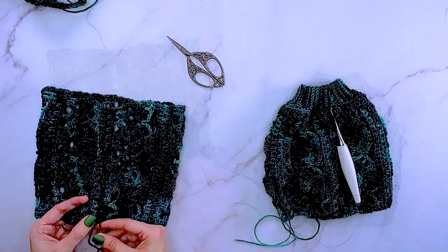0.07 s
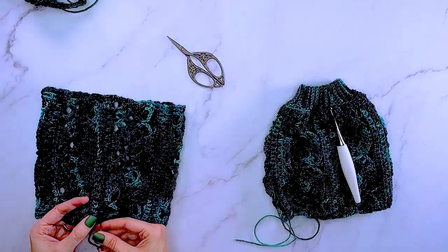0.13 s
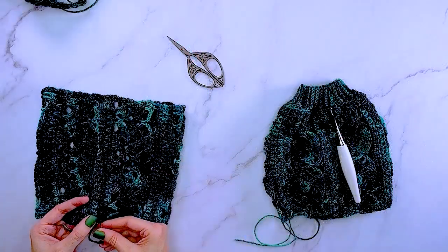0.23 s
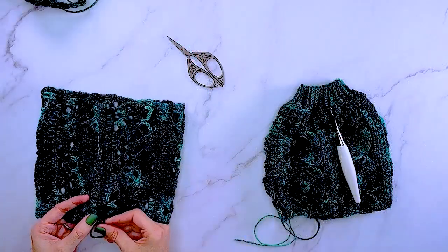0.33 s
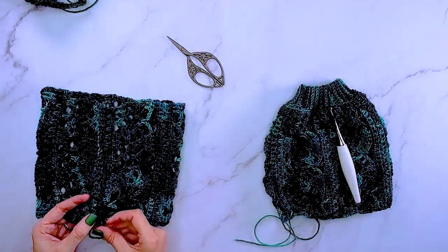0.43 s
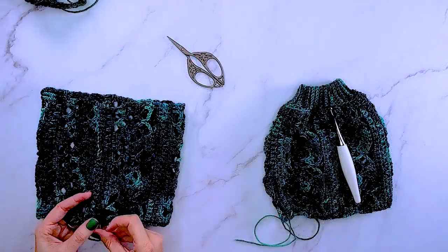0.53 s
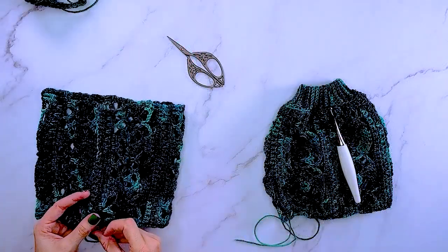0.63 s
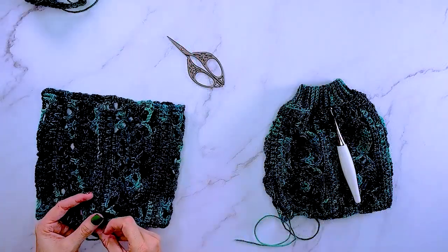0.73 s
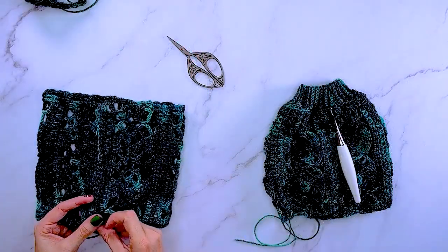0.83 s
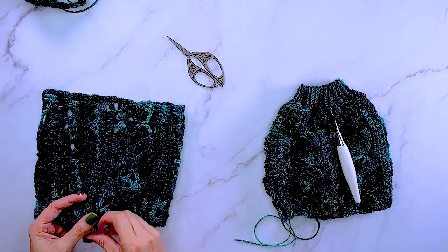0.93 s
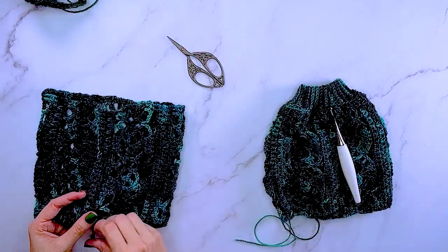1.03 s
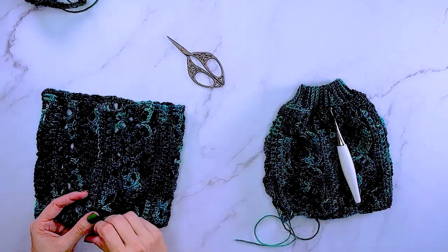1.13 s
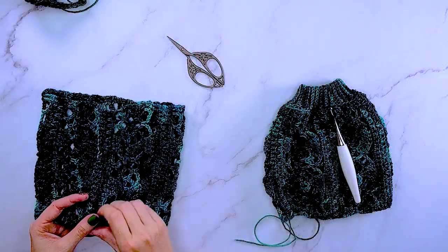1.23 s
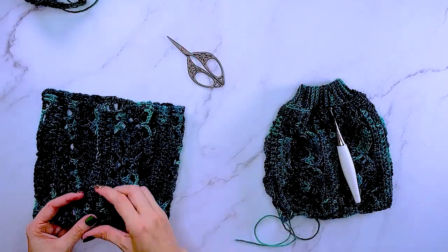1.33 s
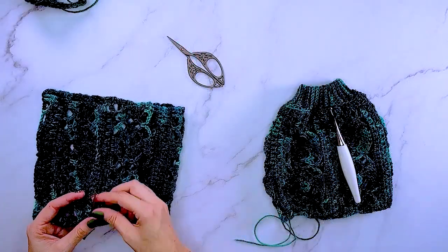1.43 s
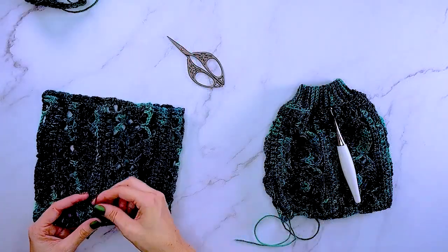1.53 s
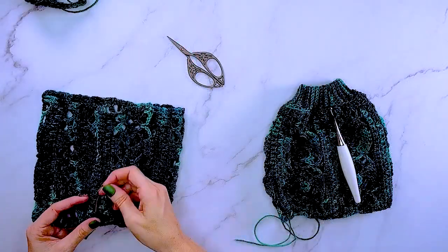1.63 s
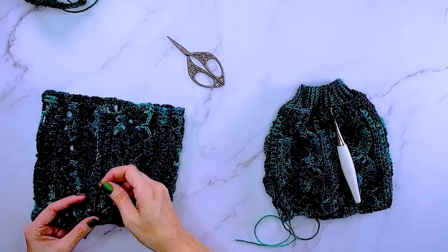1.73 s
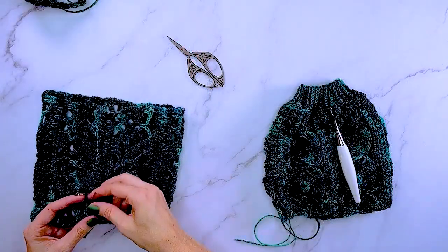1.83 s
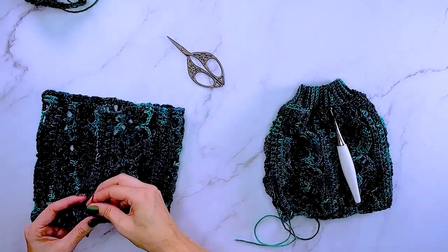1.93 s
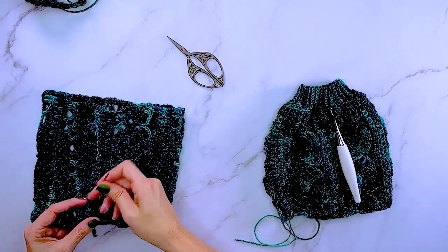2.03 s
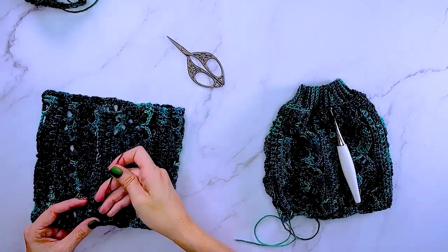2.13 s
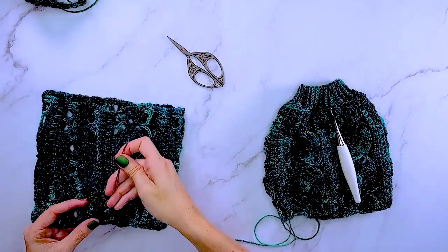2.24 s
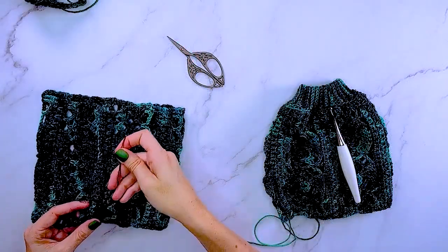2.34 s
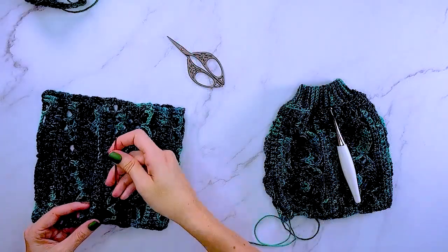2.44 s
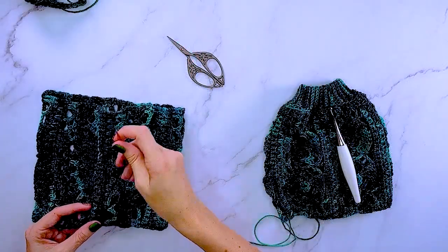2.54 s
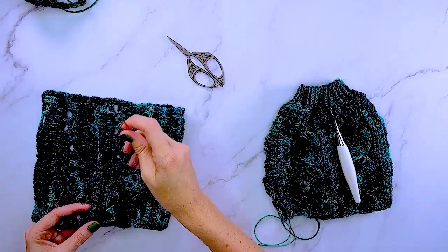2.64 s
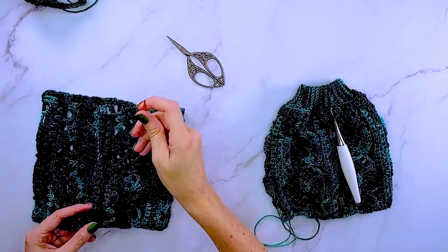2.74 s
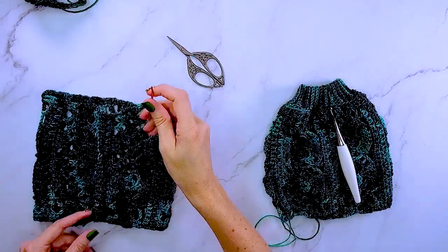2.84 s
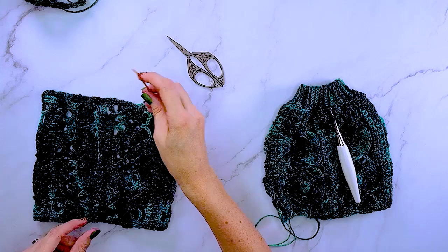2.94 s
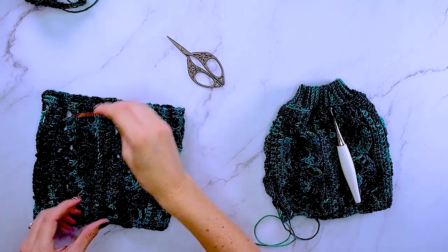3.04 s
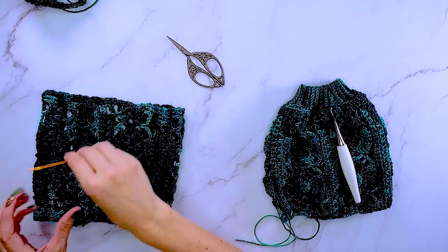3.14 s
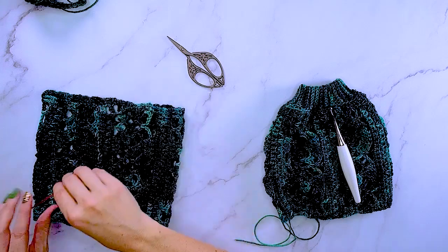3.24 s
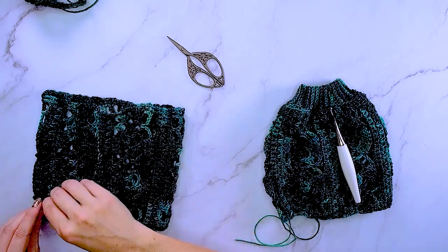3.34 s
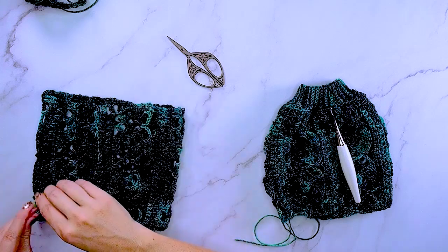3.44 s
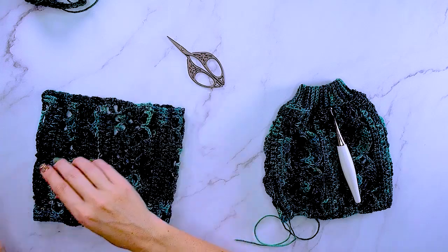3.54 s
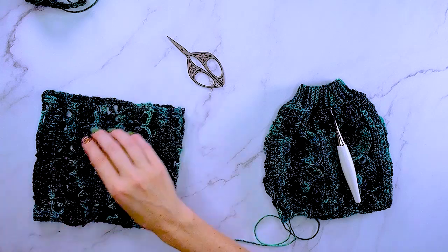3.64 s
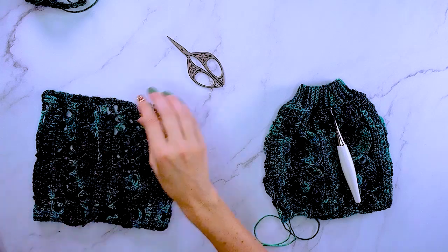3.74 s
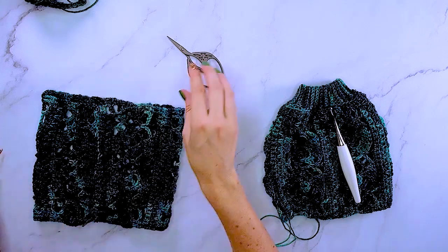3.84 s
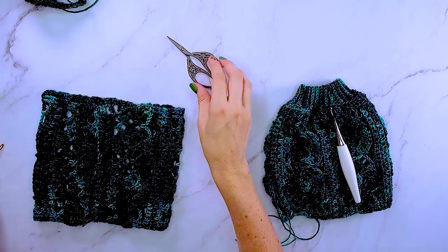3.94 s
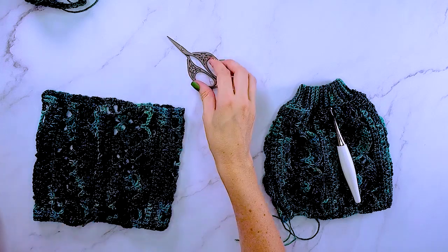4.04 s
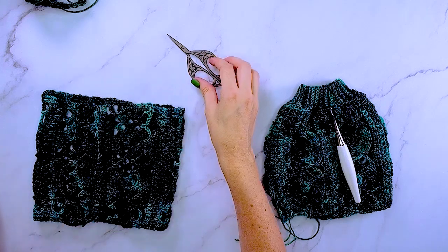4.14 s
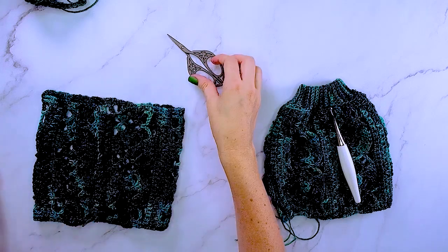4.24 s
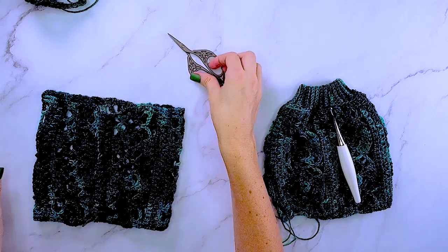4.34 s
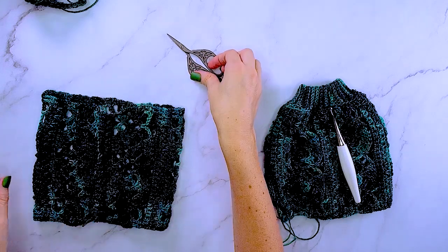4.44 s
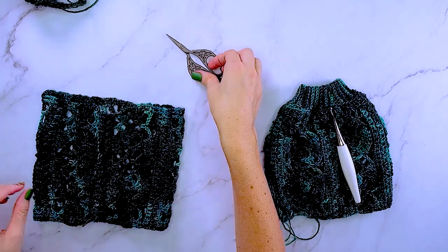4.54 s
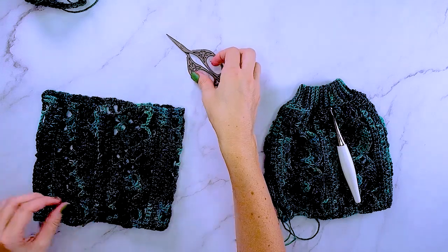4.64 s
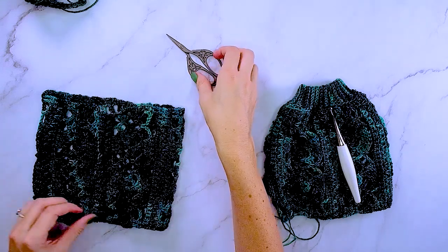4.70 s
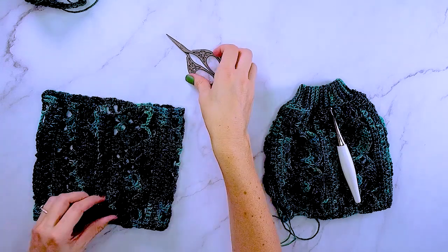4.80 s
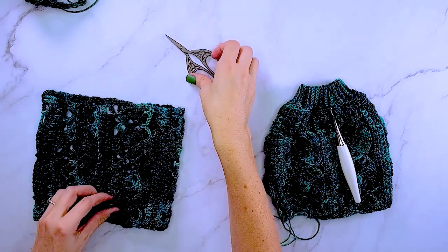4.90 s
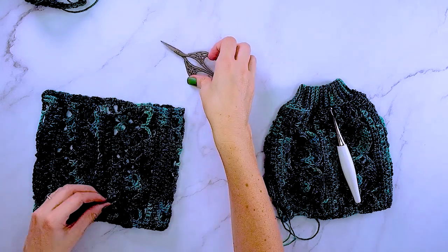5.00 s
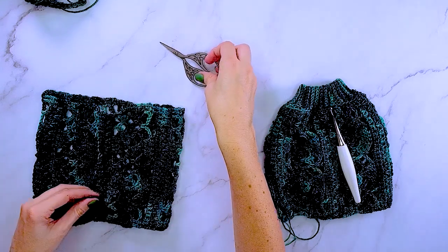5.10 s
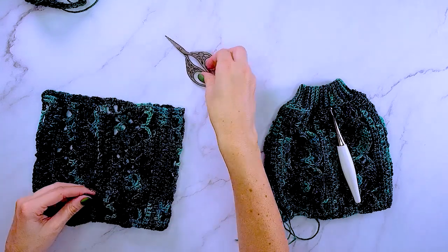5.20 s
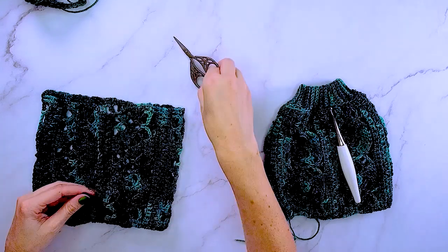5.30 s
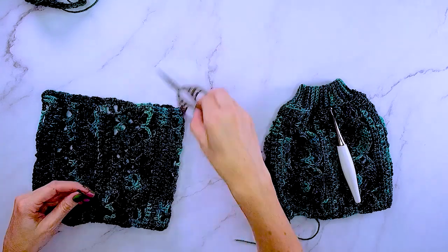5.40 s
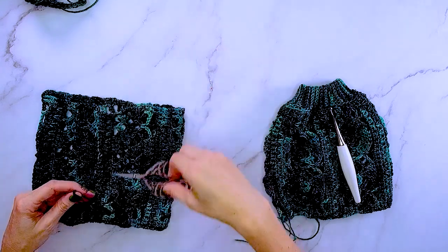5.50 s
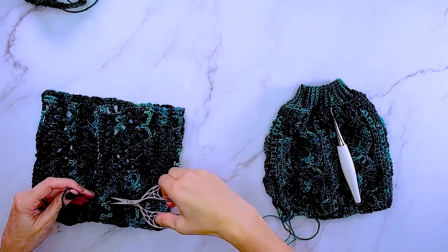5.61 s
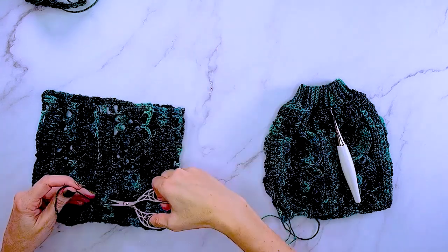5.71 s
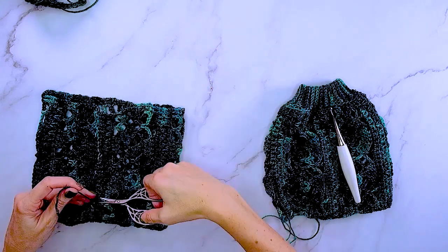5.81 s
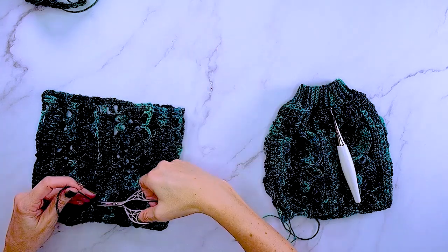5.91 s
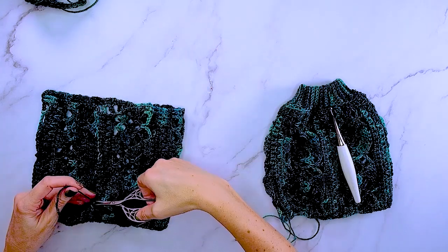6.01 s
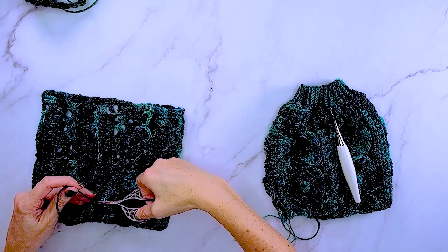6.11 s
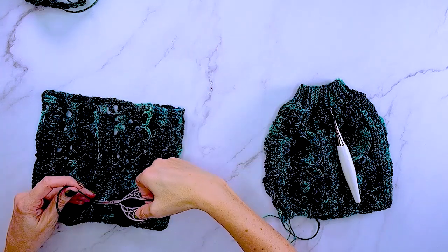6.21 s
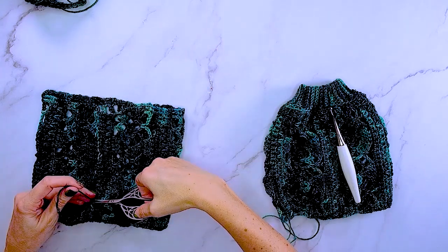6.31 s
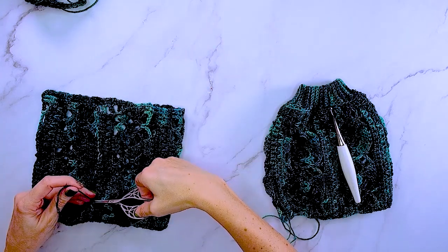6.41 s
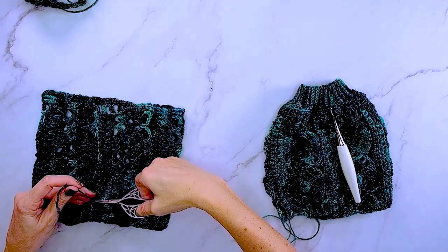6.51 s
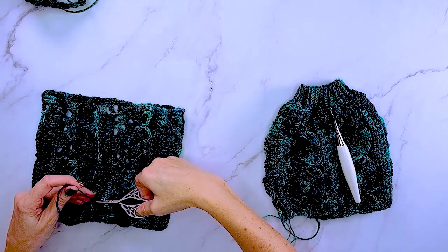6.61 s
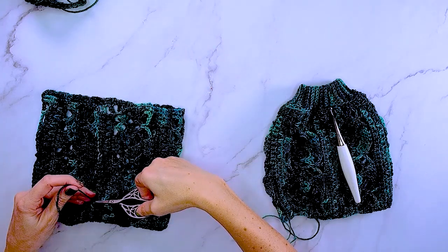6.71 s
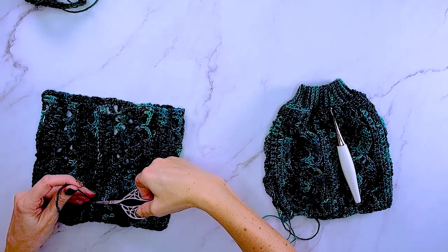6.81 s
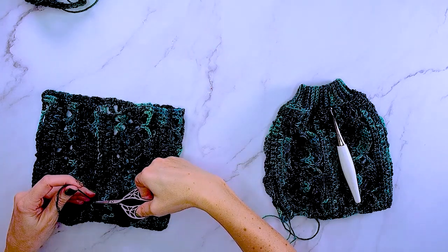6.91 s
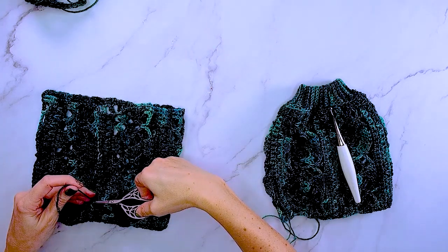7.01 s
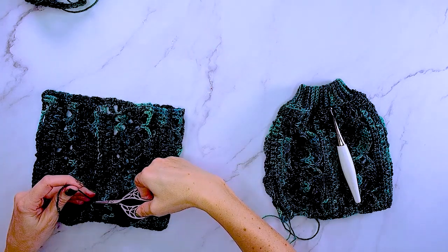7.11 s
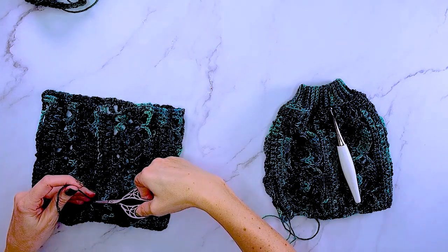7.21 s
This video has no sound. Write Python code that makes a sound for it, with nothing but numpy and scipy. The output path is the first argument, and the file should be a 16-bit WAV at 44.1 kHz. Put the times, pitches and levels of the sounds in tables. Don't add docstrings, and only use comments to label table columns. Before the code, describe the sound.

Quiet yarn tugs with tiny ticks, a distant vehicle hum, then fingers fumbling steel scissors off a hollow hard tabletop, ending in room tone.

```python
import sys
import numpy as np
from scipy import signal
from scipy.fft import rfft, irfft, next_fast_len
from scipy.io import wavfile
from scipy.ndimage import uniform_filter1d, map_coordinates

SR = 44100
rng = np.random.default_rng(int(sys.argv[2]) if len(sys.argv) > 2 else 0)


def makeup_ratio(level_db):
    decades = np.asarray(level_db, float) / 20
    return 10 ** decades


def log_audio(samples):
    frames = np.atleast_2d(samples).T
    limited = np.clip(frames, -1, 1)
    pcm = np.round(limited * 32767).astype(np.int16)
    wavfile.write(sys.argv[1], SR, pcm)


N = 319945

# start_s, knock_db, then relative to it boom_db, body_db, panel_db
BLOWS = [(3.983, -40, -36, -21, -11), (4.0486, -43, 1.5, 0, -3.5), (4.06, -38.5, -1, -6, -3.5),
         (4.0963, -40.5, 11.5, 3.5, 1), (4.1753, -28.5, -12, -24, -6.5),
         (4.1989, -33.5, -24.5, -14.5, -9.5), (4.4165, -24.5, -9.5, -20, -14),
         (4.651, -40.5, -0.5, -9, -1.5), (4.699, -38, -3, -9.5, -7), (4.8874, -34, 2, -19.5, -3.5),
         (5.0514, -27, -32, -18, 2), (5.1433, -20.5, -14.5, -14, -7), (5.1512, -28.5, -1.5, -0.5, -3.5),
         (5.2266, -18, -16.5, -9, -6)]
# mode1_db, mode2_db, mode3_db, mode4_db
BLOW_SPOT = [(0, 5.5, -3, -6), (-4, 2, 3.5, 1), (-3.5, -1.5, 0.5, 0.5), (2.5, -3.5, 1, 0.5),
             (-0.5, -9, 2, 4), (-0.5, -3, -1, 2.5), (2.5, 7, -3, -11), (-5, 9, 6, -8), (-3.5, 3.5, -5, 7),
             (2.5, 1.5, -5.5, 0.5), (-6.5, -1, 1, -7), (-4.5, 5, -14, 3), (1, -0.5, -6, 3),
             (-1, 3.5, -0.5, 3)]
# mode1_db, mode2_db, mode3_db, mode4_db
FURTHER_SPOT = (-4, 0.5, 0.5, 0.5)
BLOW_FIRST_HZ = [1046, 1046, 1046, 1046, 1040, 1050, 1050, 1060, 1046, 1046, 1000, 950, 950, 984]
# start_s,
# knock_db, softness_ratio (0 nail, 1 finger pad)
FURTHER_KNOCKS = [(0.406, -67, 0.54), (0.735, -78, 0.67), (3.9705, -57.5, 0.05), (4.0773, -40, 0.49), (4.083, -46, 1),
                  (4.1, -47.5, 0.74), (4.137, -54.5, 0.8), (4.1811, -35, 0.22), (4.2049, -42.5, 0.29),
                  (4.2237, -46, 0.25), (4.234, -51, .5), (4.2935, -52, 0.32), (4.3035, -46.5, 0.18),
                  (4.314, -56, 0.33), (4.3413, -45.5, 0.32), (4.3605, -49.5, 0.42), (4.556, -60.5, 0.75),
                  (4.584, -63, 0.22), (4.598, -53.5, .3), (4.613, -51.5, .1), (4.636, -53, .2), (4.6602, -43, 0.16),
                  (4.721, -60, .1), (4.7991, -53, 0.34), (4.9342, -43, 0.56), (5.0705, -37.5, 0.19),
                  (5.0734, -44, 0.19), (5.082, -43.5, .2), (5.0885, -44, 0.37), (5.095, -49, 0.17),
                  (5.1407, -31.5, 0.14), (5.1463, -33, 0.22), (5.157, -37, 0.59), (5.1642, -53, 0.62),
                  (5.2249, -40.5, 0.26), (5.247, -41, 0.3)]
# pitch_hz, level_db, t60_s
BOOM_MODES = [(162, 1, 0.093), (183, 0, 0.1), (127.4, -23, 0.13)]
BODY_MODES = [(295, -8.5, 0.065), (336.4, -9, 0.11), (410, -2, 0.091), (502.6, 2, 0.08)]
PANEL_MODES = [(597, -4, 0.032), (735, 2.5, 0.029), (886, -20.5, 0.14)]
KNOCK_MODES = [(1035, 0, 0.038), (1250, 0, 0.034), (1670, -3, 0.02), (1945, -10, 0.018)]
# start_s, peak_db, width_s
FLICKS = [
    (4.0497, -36.5, 0.0004),
    (4.061, -36, 0.00078),
    (4.0989, -34.5, 0.00078),
    (4.104, -34, .0008),
    (4.6985, -46, 0.00049),
    (5.2268, -29, 0.00026),
]
# start_s, level_db, upper_mode_db
EDGE_BLOWS = [
    (5.0512, -43, 1.5),
    (5.1435, -30.5, -11),
    (5.1517, -39, -8),
    (5.2265, -34, -12),
    (4.06, -57.5, 0),
]
# pitch_hz, level_db, t60_s
EDGE_MODES = [(476.6, -0.5, 0.12), (705, -6.5, .1)]
# start_s, click_db, snap_db (relative to the click), t60_s
CLICKS = [(3.97, -66.5, 2, 0.016), (3.983, -62.5, 8.5, 0.054), (4.0497, -49, -4, 0.0091),
          (4.061, -48.5, 0, 0.0093), (4.079, -53, -5, 0.013), (4.0834, -62, -3, 0.013),
          (4.1029, -55.5, 11, 0.013), (4.1282, -57, -15, 0.019), (4.1705, -46, -4, 0.016),
          (4.1755, -17, -8, 0.0061), (4.1794, -52, 9, 0.015), (4.1955, -44, -3, .012),
          (4.1988, -38, -1, 0.01), (4.2015, -43, -6, 0.0091), (4.2045, -51, -8, 0.01),
          (4.2028, -48.5, 3, 0.036), (4.2274, -53, -4, 0.011), (4.2804, -58, -3, 0.012),
          (4.2934, -61, -11, 0.014), (4.3262, -68, -8, .012), (4.3415, -56, -4, 0.02),
          (4.3586, -57, -4, .012), (4.418, -29, -7, 0.0035), (4.598, -68, -10, 0.0083),
          (4.6119, -69, -9, 0.011), (4.6519, -49.5, 0.5, 0.0054), (4.6987, -39.5, -17, 0.0082),
          (4.8888, -37.5, 1, 0.0097), (5.0496, -52, 0, 0.026), (5.1415, -36.5, -7, 0.011),
          (5.1435, -29.5, -13, 0.0081), (5.1465, -45, -10, 0.007), (5.1528, -51, 2, 0.01),
          (5.2235, -47, -7, .01), (5.2268, -37.5, -11, 0.015)]
FAINT_CLICKS = [
    (4.139, -67, -7.5, .008),
    (4.158, -65, 8, 0.011),
    (4.303, -66, -6, .01),
]
# pitch_hz, width_hz, level_db
CLICK_PEAKS = [(3180, 600, 7), (4450, 2700, -3.5), (5800, 480, -8)]
# pitch_hz, width_hz, level_db
SNAP_PEAKS = [(6500, 1800, -0.5), (9550, 2500, 1.5), (10260, 3000, -2)]
# start_s, length_s, level_db, weight_db (boom), grit_db (hiss)
STROKES = [(3.988, 0.063, -75, -7, -12), (4.09, 0.15, -68, -1.5, -21), (4.188, 0.051, -67.5, -18, 8),
           (4.289, 0.14, -67, 5, -11.5), (4.585, 0.12, -73.5, 3, -37), (4.677, 0.065, -69, 11.5, -31),
           (4.76, 0.19, -67.5, -8, -22), (4.875, 0.15, -67.5, -12.5, -4.5),
           (5.058, 0.089, -60.5, -19.5, -3), (5.165, 0.1, -65, -5.5, -9), (5.241, 0.093, -70, -1.5, -1),
           (5.403, 0.014, -81, -5, 10)]
# pitch_hz, width_hz, level_db
RUB_PEAKS = [(500, 110, -7.5), (620, 76, -2.5), (740, 160, -3.5)]
# pitch_hz, density_db
GRIT_COLOUR = [(1470, -39), (2300, -1.5), (2780, -17.5), (3200, -5.5), (3660, -6), (4550, -7), (5650, -9),
               (7830, -20.5), (8660, -12.5), (15400, -38.5), (16000, -55)]
# time_s, level_db
PALM = [
    (4.54, -76.5),
    (4.69, -57),
    (4.784, -65),
    (4.84, -61),
    (5.12, -61.5),
    (5.182, -65),
    (5.308, -79),
    (5.37, -65.5),
]
# pitch_hz, width_hz, level_db
PALM_PEAKS = [(322.4, 74, -4.5), (411, 27, -3.5)]
# pitch_hz, half_length_s, peak_db
CHIRP = [
    (728, 0.0094, -41),
]
# time_s, level_db, pitch_hz
GROAN = [(4.72, -80, 339.3), (4.75, -62, 346), (4.8, -65, 384.3), (4.84, -64, 389), (4.88, -66, 370.6),
         (4.95, -67, 380), (4.99, -63, 363), (5.03, -61, 348), (5.08, -73.5, 350)]
# time_s, level_db, pitch_hz
PANEL_SKID = [(4.55, -79, 691), (4.565, -68, 693), (4.62, -71, 720), (4.7, -78, 740), (4.84, -72, 760),
              (4.88, -61.5, 756), (4.92, -58, 740), (4.98, -72, 730)]
# time_s, level_db, pitch_hz
WRIST_LEAN = [(4.1, -68, 119), (4.13, -57, 116), (4.17, -52, 114), (4.215, -58, 115), (4.24, -66, 117.2),
              (4.28, -66, 120), (4.3, -61, 120), (4.4, -63.5, 117), (4.44, -74.5, 118)]
# pitch_hz, level_db, t60_s
STEEL_MODES = [(4600, 2, 0.018), (6850, 3, 0.014), (10230, -10, 0.043), (10040, -14.5, .095),
               (11600, -20, 0.024), (13300, -23.5, .02)]
CHINK_S = [4.416, 4.888, 5.051, 4.175]
CHINK_DB = [-47, -43, -67.5, -62]
CHINK_LOW_DB = [1, -1, 18, -11]
CHINK_LEAN_DB = [4, -1, -14, 0.5]
# start_s, length_s, level_db
FLAT_DRAGS = [
    (4.644, 0.107, -72),
    (4.85, 0.11, -69),
    (4.95, .2, -78),
]
# pitch_hz, width_hz, level_db
FLAT_PEAKS = [(1783, 270, -1.5), (2350, 350, -1.5), (4750, 410, -8.5), (9510, 700, -16)]
# start_s, length_s, level_db
EDGE_DRAGS = [
    (5.235, 0.045, -61),
    (5.18, .02, -71),
    (5.3, 0.022, -65.5),
]
# pitch_hz, width_hz, level_db
EDGE_PEAKS = [(1995, 90, -2.5), (3040, 120, -7), (3676, 140, 2), (4170, 90, -6.5), (5600, 150, -4.5),
              (8566, 360, -10), (9500, 300, -14), (13000, 500, -31), (15000, 500, -33.5)]
BRUSH_S = [4.33, 4.295]
# length_s, level_db
BRUSHES = [
    (0.062, -74),
    (0.0091, -77),
]
# pitch_hz, width_hz, level_db
BRUSH_PEAKS = [(3300, 340, -3), (4500, 400, -2.5), (6400, 350, -0.5), (7700, 1000, -2), (9400, 250, -6)]
# start_s, length_s, level_db
AIR = [(4.418, .004, -74), (4.888, .008, -66), (5.144, .003, -68.5), (5.153, .006, -78), (5.223, .006, -73),
       (5.26, .07, -83), (5.405, .015, -85), (1.516, .004, -72), (2.08, .07, -87), (2.17, .06, -87),
       (3.462, .05, -86), (4.176, .03, -75)]
# pitch_hz, width_hz, level_db
AIR_PEAKS = [(13200, 600, -0.5), (14200, 250, -4), (15050, 300, -1)]
# time_s, level_db, pitch_hz
RING_SKID = [(4.58, -80, 1607), (4.62, -74, 1620), (4.68, -70, 1680), (4.77, -76, 1780), (4.85, -72, 1975),
             (4.93, -72.5, 1894), (5.02, -74, 1800), (5.05, -85, 1800)]
# time_s, level_db, pitch_hz
BLADE_TIP = [(5.16, -79.5, 2080), (5.195, -61.5, 2030), (5.225, -61.5, 1990), (5.255, -58.5, 2030),
             (5.285, -67, 1900), (5.33, -72, 1850)]
# time_s, level_db, pitch_hz
BLADE_SHIMMER = [(5.19, -85, 3600), (5.215, -63, 3650), (5.24, -64.5, 3700), (5.26, -59, 3720),
                 (5.29, -63.5, 3700), (5.31, -80, 3650)]
# time_s, level_db, centre_hz
YARN_PULL = [(2.02, -98, 6300), (2.045, -64, 6150), (2.092, -58, 6400), (2.136, -65.5, 6600),
             (2.212, -64.5, 7340), (2.27, -67.5, 7300), (2.32, -66, 7350), (2.372, -73, 7450),
             (2.39, -82, 7500), (2.45, -90, 7400)]
# start_s, length_s, level_db, centre_hz
YARN_TUGS = [(0.371, 0.039, -77.5, 6500), (0.508, 0.18, -89.5, 7200), (0.82, 0.07, -84.5, 5300),
             (0.956, 0.044, -85.5, 7300), (1.238, 0.038, -80, 5900), (1.525, 0.03, -78, 6550),
             (1.666, 0.044, -77, 6740), (1.843, 0.027, -81, 4750), (2.524, 0.035, -74, 6100),
             (2.613, 0.032, -83.5, 5750), (2.67, 0.052, -84, 5700), (2.808, 0.03, -79, 7300),
             (3.27, .04, -89.5, 6860), (3.465, 0.044, -74.5, 8300), (3.52, 0.058, -79.5, 8640),
             (3.594, .035, -84.5, 7150), (5.118, .02, -67, 7350), (5.307, 0.017, -71, 7680),
             (5.409, 0.0054, -63.5, 6830), (5.44, 0.17, -92.5, 7300)]
# pitch_hz, density_db
WOOL_DULL = [(1500, -50), (2600, -27), (3700, -24), (4300, -4), (6100, 2), (7200, -9), (8700, -3),
             (10000, -8), (12300, -14), (16000, -30)]
WOOL_BRIGHT = [(1500, -41.5), (4400, -19.5), (5100, -6.5), (6400, -2.5), (7500, -6), (8500, 1.5),
               (10300, -9), (12200, -7.5), (13300, -22), (16000, -36)]
# start_s, peak_db, centre_hz, spread_ratio
FIBRE_SNAPS = [(.385, -56, 4700, 0.99), (.39, -38, 4500, 1.1), (0.411, -55, 4600, 1.1),
               (1.27, -54, 5500, 1.7), (1.516, -36.5, 6500, 2.03), (1.82, -59, 5200, 1.2),
               (2.044, -55, 6000, 1.5), (3.983, -35, 9300, 1.15), (1.521, -48, 5200, 1.1),
               (1.8492, -54, 6000, 1), (1.895, -54, 5200, 1.1), (2.097, -48, 5800, 1.25),
               (2.058, -50, 6300, 1.1)]
# start_s, peak_db, pitch_hz, brightness_db, t60_s
TICKS = [
    (1.8491, -43.5, 1810, -20, 0.015),
    (1.8947, -55.5, 1970, -37, 0.013),
]
# time_s, level_db, pitch_hz
THREAD_SQUEAK = [(1.885, -98, 2080), (1.9, -74, 2030), (1.96, -83, 2010), (1.975, -91, 1980),
                 (2.01, -80, 1920), (2.05, -85, 1885), (2.1, -79, 1790), (2.16, -86, 1860),
                 (2.2, -93, 1780)]
# time_s, level_db, whine_hz
DRONE = [(0.75, -90, 326.6), (1.046, -74.5, 334.7), (1.164, -79, 344.3), (1.8, -74, 351),
         (1.87, -67.5, 364.4), (2.036, -80.5, 359.6), (2.13, -74, 359), (2.3, -91, 338)]
# pitch_hz, width_hz, level_db
DRONE_PEAKS = [(337, 79, 2.5), (507, 71, 0), (1030, 690, -20)]
# pitch_hz, density_db
ROOM_TONE = [(12, -32), (20, 1.5), (32, -8.5), (65, -13.5), (92, -26), (124, -19), (190, -32), (216, -40),
             (270, -28.5), (406, -34), (446, -41.5), (589, -33), (1700, -47), (2210, -76), (3740, -120)]
# pitch_hz, width_hz, level_db
HUM_PEAKS = [(49.4, 16, -0.5), (125, 8.5, -5), (184, 13, -10.5), (594, 110, -28), (1186, 160, -28.5)]
# time_s, level_db
SWAY = [(0, -59.5), (2.3, -60), (2.6, -47.5), (3, -62), (3.45, -40.5), (3.8, -57.5), (4.1, -48),
        (4.7, -55.5), (5.3, -61.5), (6.2, -59), (7.25, -69.5)]
# pitch_hz, density_db
HISS_COLOUR = [(1700, 0), (2000, -4.5), (2800, -6.5), (5800, -9), (7900, -10), (8100, -6.5), (9500, -8),
               (12000, -10.5), (16000, -27.5)]
# pitch_hz, t60_s
WALLS = [(150, 0.27), (1000, 0.15), (5000, 0.14), (12000, 0.03)]
# pitch_hz, level_db
MIC = [(20, 0), (11000, -0.5), (13000, -3.5), (15000, -10), (16000, -12)]


def unit(x):
    return x / np.sqrt(np.mean(x ** 2) + 1e-20)


def along(points, hz):
    f, v = np.transpose(points)
    return np.interp(np.log(hz + 1), np.log(f + 1), v)


def curves(rows):
    s, *cols = np.transpose(rows)
    return [np.interp(np.arange(N) / SR, s, c) for c in cols]


def sounding(rows):
    t = np.arange(N) / SR
    return uniform_filter1d(1. * (t > rows[0][0]) * (t < rows[-1][0]), size=900)


def swell(s, length, db, rise, fall):
    t = np.arange(N) / SR - s
    away = np.maximum(np.maximum(-t / rise, (t - length) / fall), 0)
    return makeup_ratio(db - 20 * away.clip(max=9))


def wobble(rate):
    return map_coordinates(rng.standard_normal(int(N * rate / SR) + 4), [np.arange(N) * rate / SR])


def filtered(x, response):
    m = next_fast_len(N + SR // 2)
    return irfft(rfft(x, m) * response(np.fft.rfftfreq(m, 1 / SR)), m)[..., :N]


def resonant(peaks):
    return lambda f: sum((-1) ** k * makeup_ratio(db) * 1j * f * w / (c * c - f * f + 1j * f * w)
                         for k, (c, w, db) in enumerate(peaks))


def noise(response, grain_db=0, rate=300):
    return unit(filtered(rng.standard_normal(N) * makeup_ratio(grain_db * wobble(rate)), response))


def whine(rows, width_hz, steady=0.6):
    db, hz = curves(rows)
    narrow = steady + 0.75 * noise(lambda f: 1 / (1 + (f / width_hz) ** 2))
    tone = np.sin(2 * np.pi * np.cumsum(hz) / SR) * np.sqrt(2)
    return sounding(rows) * makeup_ratio(db) * narrow * tone


def shifted(modes, extra_db):
    return modes + np.outer(extra_db, [0, 1, 0])


def ring(modes, t, draw):
    hz, db, t60 = np.transpose(modes)[:, :, None]
    level, detune, phase = draw[:, :len(modes), None]
    tones = np.sin(2 * np.pi * hz * (1 + .012 * detune) * t + .4 * phase)
    x = np.sum(makeup_ratio(db + 2 * level - 60 * t / t60) * tones, axis=0)
    x = x * (1 - np.exp(-t * hz.mean() / 1.1))
    return x / np.abs(x).max()


def add_at(out, s, x):
    out[round(s * SR):][:len(x)] += x


def knocks():
    out, t = np.zeros(N + SR), np.arange(SR // 4) / SR
    nail_db, pad_db = np.array([-28, -23.5, -13]), np.array([6.5, 3.5, 7])
    taps = [(s, db, *(nail_db + soft * (pad_db - nail_db))) for s, db, soft in FURTHER_KNOCKS]
    blows = list(BLOWS) + taps
    spots = list(BLOW_SPOT) + [FURTHER_SPOT] * len(taps)
    firsts = list(BLOW_FIRST_HZ) + [KNOCK_MODES[0][0]] * len(taps)
    draws = rng.standard_normal((len(blows), 4, 3, 8))
    force = 0.41 + 0.48 * makeup_ratio(-60 * t / 0.028)
    for (s, db, boom_db, body_db, panel_db), draw, spot_db, first_hz in zip(blows, draws, spots, firsts):
        knock_modes = shifted([(first_hz, *KNOCK_MODES[0][1:]), *KNOCK_MODES[1:]], spot_db)
        x = makeup_ratio(db + 0.1) * ring(knock_modes, t, draw[0])
        x += makeup_ratio(db + boom_db) * ring(BOOM_MODES, t, draw[1])
        x += makeup_ratio(db + body_db + 2) * ring(BODY_MODES, t, draw[2])
        x += makeup_ratio(db + panel_db + 5) * ring(PANEL_MODES, t, draw[3])
        add_at(out, s, -force * x)
    return out[:N]


def flicks():
    out, t = np.zeros(N + SR), np.arange(SR // 4) / SR
    for s, db, width in FLICKS:
        u = t / width
        add_at(out, s, -makeup_ratio(db) * u * (1 - u / 3) * np.exp(1 - u))
    for s, db, upper_db in EDGE_BLOWS:
        modes = shifted(EDGE_MODES, [0, upper_db])
        add_at(out, s, -makeup_ratio(db) * ring(modes, t, rng.standard_normal((3, 2))))
    return out[:N]


def clicks():
    low, high, spikes = np.zeros(N + SR), np.zeros(N + SR), np.zeros((2, N))
    t = np.arange(SR // 4) / SR
    rise = 1 - np.exp(-t / 0.00051)
    for s, db, snap_db, t60 in list(CLICKS) + list(FAINT_CLICKS):
        burst = (makeup_ratio(-60 * t / t60) + 0.15 * makeup_ratio(-60 * t / (7 * t60))) * rise
        add_at(low, s, makeup_ratio(db - 7) * burst)
        add_at(high, s, makeup_ratio(db + snap_db - 6.5) * burst)
        spikes[:, round(s * SR)] -= makeup_ratio([db + 3, db + snap_db + 5])
    dull = lambda hz: resonant(CLICK_PEAKS)(hz) / (1 + (hz / 6500) ** 6) / (1 + (2900 / (hz + 1)) ** 12)
    sharp = lambda hz: resonant(SNAP_PEAKS)(hz) / (1 + (5500 / (hz + 1)) ** 6) / (1 + (hz / 13500) ** 6)
    bursts = low[:N] * noise(dull) + high[:N] * noise(sharp)
    return bursts + filtered(spikes[0], dull) + filtered(spikes[1], sharp)


def sliding():
    boom = body = knock = grit = 0
    for s, length, db, weight_db, grit_db in STROKES:
        stroke = swell(s, length, db, rise=0.021, fall=0.031)
        boom = boom + stroke * makeup_ratio(weight_db)
        body = body + stroke * makeup_ratio(3 + 0.2 * weight_db)
        knock = knock + stroke
        grit = grit + stroke * makeup_ratio(grit_db)
    broad = lambda modes: resonant([(hz, 3 / t60, db) for hz, db, t60 in modes])
    out = boom * noise(broad(BOOM_MODES), 2.5, 40) + body * noise(resonant(RUB_PEAKS), 1.5, 90)
    out += knock * noise(lambda hz: broad(KNOCK_MODES)(hz) / (1 + (hz / 2600) ** 6), 1.5, 150)
    out += grit * noise(lambda hz: makeup_ratio(along(GRIT_COLOUR, hz)), 1.5, 400)
    palm = noise(lambda hz: resonant(PALM_PEAKS)(hz) ** 2, 2.1, 25)
    out += sounding(PALM) * makeup_ratio(curves(PALM)[0]) * palm
    hz, half, db = CHIRP[0]
    t = np.arange(N) / SR - 4.949
    out += makeup_ratio(db) * np.exp(-(t / half) ** 2) * np.sin(2 * np.pi * hz * t)
    return out + whine(GROAN, width_hz=24) + whine(PANEL_SKID, width_hz=31) + whine(WRIST_LEAN, width_hz=7)


def blades():
    chinks, t = np.zeros(N + SR), np.arange(SR // 4) / SR
    draws = 0.4 * rng.standard_normal((len(CHINK_S), 3, 8))
    for s, db, low_db, lean_db, draw in zip(CHINK_S, CHINK_DB, CHINK_LOW_DB, CHINK_LEAN_DB, draws):
        low = ring(shifted(STEEL_MODES[:2], [lean_db, 0]), t, draw)
        add_at(chinks, s, makeup_ratio(db) * (ring(STEEL_MODES[2:], t, draw) + makeup_ratio(low_db) * low))
    rattle = 0.9 + 0.55 * wobble(rate=900) + 0.3 * wobble(rate=82)
    flat = sum(swell(*row, rise=0.048, fall=0.12) for row in FLAT_DRAGS)
    edge = sum(swell(*row, rise=0.05, fall=0.01) for row in EDGE_DRAGS)
    brush = sum(swell(s, *row, rise=0.016, fall=0.02) for s, row in zip(BRUSH_S, BRUSHES))
    air = sum(swell(*row, rise=0.004, fall=0.012) for row in AIR)
    drag = flat * noise(lambda hz: resonant(FLAT_PEAKS)(hz) ** 1.3 / (1 + (hz / 10500) ** 6), 2.1, 200)
    drag += edge * noise(resonant(EDGE_PEAKS), 1.2, 60)
    drag += brush * noise(lambda hz: resonant(BRUSH_PEAKS)(hz) ** 1.6, 1.7, 300)
    drag += air * noise(lambda hz: resonant(AIR_PEAKS)(hz) ** 2)
    skids = whine(RING_SKID, width_hz=28) + whine(BLADE_TIP, width_hz=30) + whine(BLADE_SHIMMER, width_hz=70)
    return chinks[:N] * rattle + drag + skids


def yarn():
    bright_colour = lambda hz: makeup_ratio(along(WOOL_BRIGHT, hz))
    taut_hz = 7460
    taut_colour = lambda hz: bright_colour(hz) * (hz / taut_hz) ** 2 / (1 + (taut_hz / (hz + 1)) ** 6)
    dull = noise(lambda hz: makeup_ratio(along(WOOL_DULL, hz)), 1.7, 500)
    bright = noise(bright_colour, 0.98, 380)
    taut = noise(taut_colour)

    def fibres(centre_hz):
        turn = np.clip((centre_hz - 6000) / 1500, 0, 2) * np.pi / 2
        outer = np.where(turn < np.pi / 2, dull, taut)
        return np.abs(np.cos(turn)) ** 0.83 * outer + np.sin(turn) * bright

    db, centre_hz = curves(YARN_PULL)
    out = sounding(YARN_PULL) * makeup_ratio(db) * fibres(centre_hz)
    for s, length, db, hz in YARN_TUGS:
        out += swell(s, length, db, rise=0.016, fall=0.03) * fibres(hz)
    return out * makeup_ratio(1.1 * wobble(35))


def snaps():
    out, t = np.zeros(N), np.arange(400) / SR
    for s, db, hz, spread in FIBRE_SNAPS:
        burst = (t == 0) + 0.15 * makeup_ratio(-60 * t / 0.006) * rng.standard_normal(len(t))
        spread = max(spread, 1.1)
        band = signal.butter(2, [hz / spread, min(spread * hz, 17000)], "band", fs=SR, output="sos")
        add_at(out, s, makeup_ratio(db + 6) * signal.sosfilt(band, burst))
    return out


def needle():
    out, t = np.zeros(N + SR), np.arange(SR // 10) / SR
    for s, db, hz, bright_db, t60 in TICKS:
        partner = 0.69 * makeup_ratio(-60 * t / 0.013) * np.sin(2 * np.pi * 1.93 * hz * t)
        tone = np.sin(2 * np.pi * hz * t) + partner
        crack = makeup_ratio(bright_db + 4 - 60 * t / 0.017) * uniform_filter1d(rng.standard_normal(len(t)), size=4)
        add_at(out, s, makeup_ratio(db + 0.5) * (tone * makeup_ratio(-60 * t / t60) + crack))
    return out[:N] + whine(THREAD_SQUEAK, width_hz=170, steady=0)


def room(x):
    hz, t, z = signal.stft(rng.standard_normal(SR // 2), SR, nperseg=256)
    decay = makeup_ratio(-60 * t / along(WALLS, hz)[:, None])
    tail = signal.istft(z / (np.abs(z) + 1e-9) * decay, SR, nperseg=256)[1]
    delayed = np.pad(x, (350, 0))
    return signal.fftconvolve(delayed, tail / np.linalg.norm(tail))[:N]


def background():
    tone = makeup_ratio(-64 + 1.1 * wobble(2.7)) * noise(lambda hz: makeup_ratio(along(ROOM_TONE, hz)) * (hz < 1700))
    hiss = makeup_ratio(-88) * noise(lambda hz: makeup_ratio(along(HISS_COLOUR, hz)) * (hz >= 1700))
    hum = makeup_ratio(-73.5 + 0.44 * wobble(2.4)) * noise(resonant(HUM_PEAKS))
    drone = sounding(DRONE) * makeup_ratio(curves(DRONE)[0] + 0.5) * noise(resonant(DRONE_PEAKS), 0.44, 15)
    drone += makeup_ratio(-5) * whine(DRONE, width_hz=9.6)
    rocking = noise(lambda f: resonant([(4.2, 4, 0), (11, 3, -3)])(f) / (1 + (f / 14) ** 10))
    return tone + hiss + hum + drone + makeup_ratio(curves(SWAY)[0]) * rocking


def scene():
    near = knocks() + flicks() + clicks() + blades() + needle()
    return (near + makeup_ratio(-14.5) * room(near) + sliding() + yarn() + snaps() + background())[None]


def band_limit(x):
    return signal.sosfilt(signal.butter(12, 16330, fs=SR, output="sos"), x)


def record(dry):
    heard = filtered(dry, lambda hz: makeup_ratio(along(MIC, hz)))
    hz, _, z = signal.stft(heard, SR, nperseg=1024)
    gates = ((12050, 12800, -114), (12800, 13500, -115), (13500, 14800, -114), (14800, 15700, -117),
             (15700, SR, -100))
    for lo, hi, gate_db in gates:
        band = (hz >= lo) & (hz < hi)
        power = np.mean(np.abs(z[:, band]) ** 2, axis=1, keepdims=True)
        z[:, band] *= power > makeup_ratio(2 * gate_db)
    mix = signal.istft(z, SR, nperseg=1024)[1][:, :N]
    return band_limit(mix)


dry = scene()
out = record(dry)
log_audio(out)
```